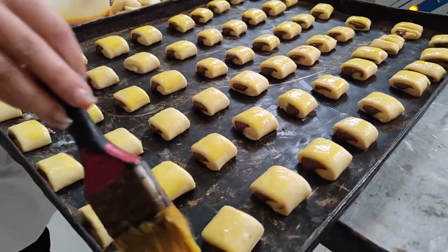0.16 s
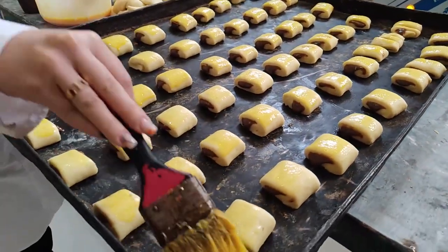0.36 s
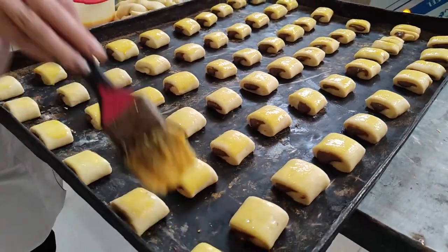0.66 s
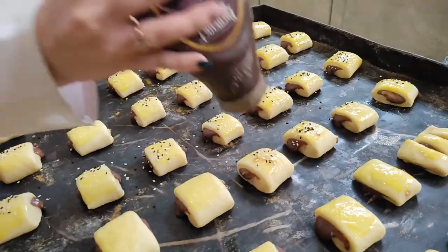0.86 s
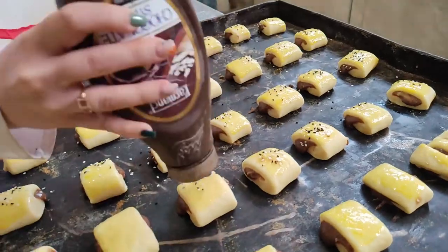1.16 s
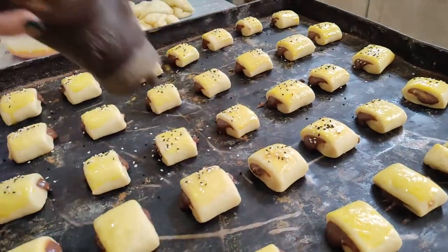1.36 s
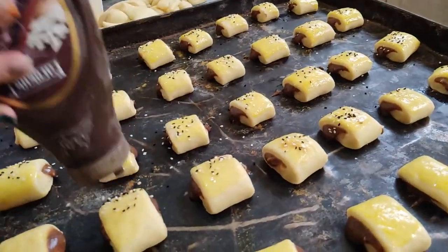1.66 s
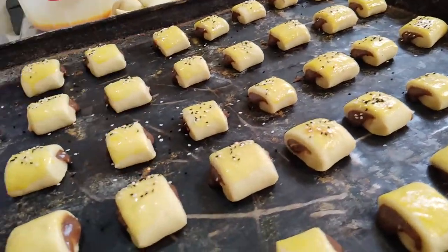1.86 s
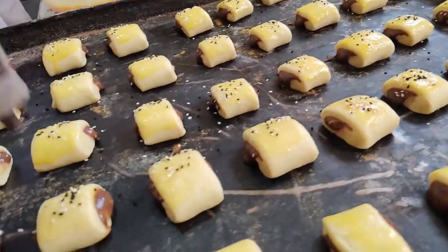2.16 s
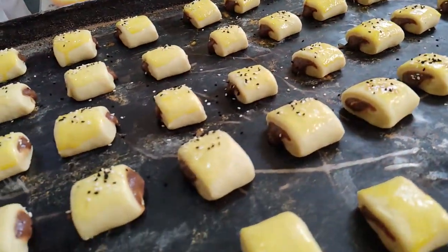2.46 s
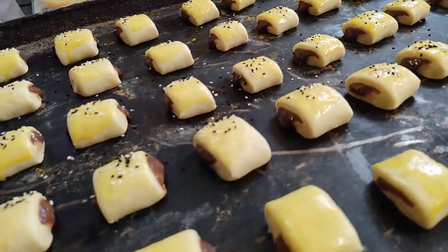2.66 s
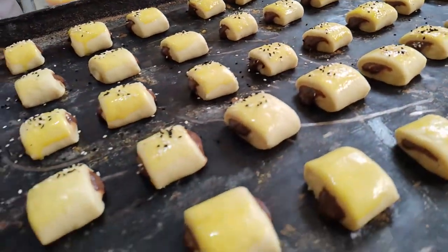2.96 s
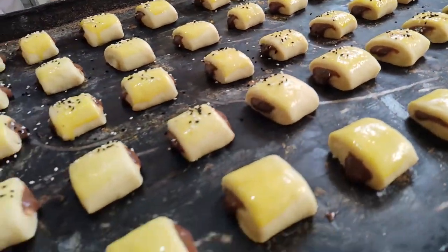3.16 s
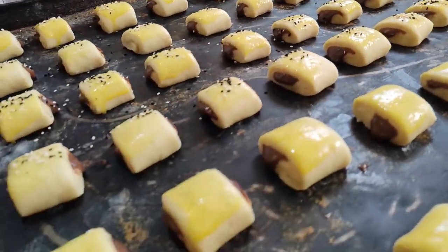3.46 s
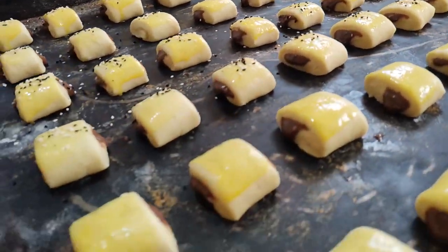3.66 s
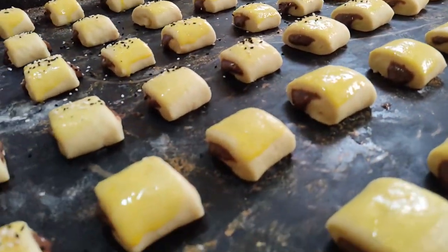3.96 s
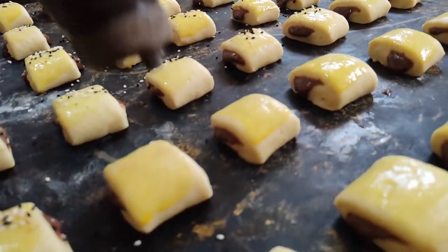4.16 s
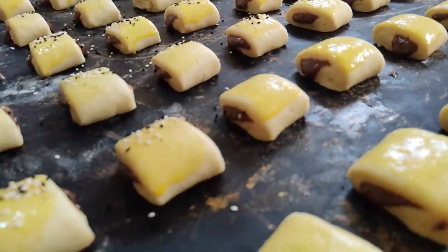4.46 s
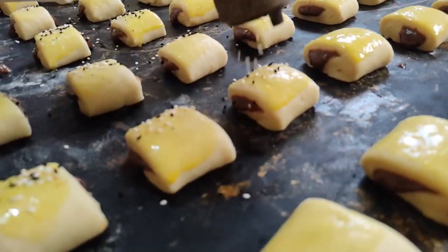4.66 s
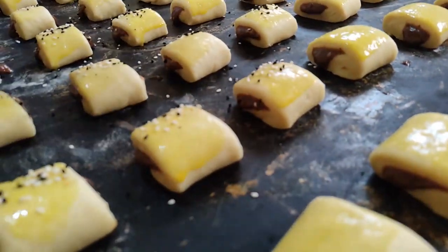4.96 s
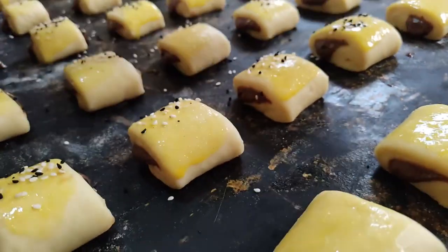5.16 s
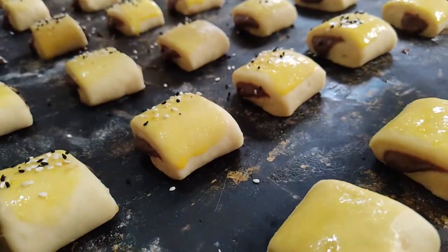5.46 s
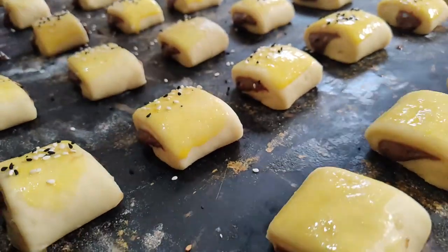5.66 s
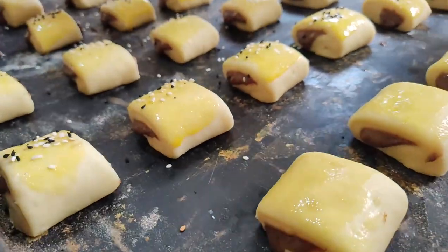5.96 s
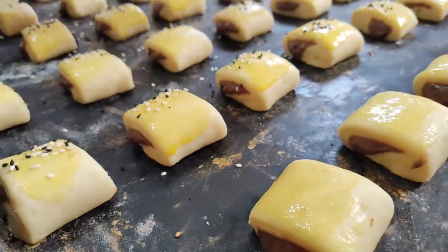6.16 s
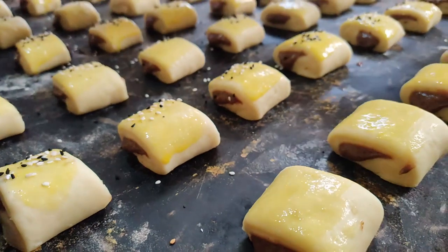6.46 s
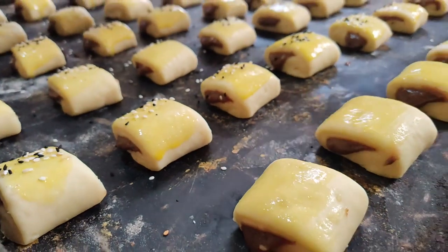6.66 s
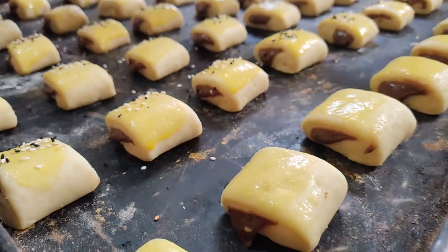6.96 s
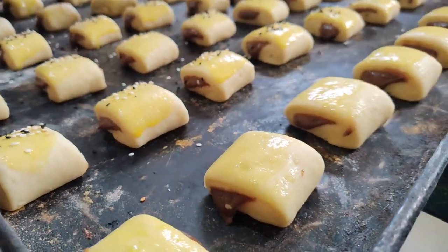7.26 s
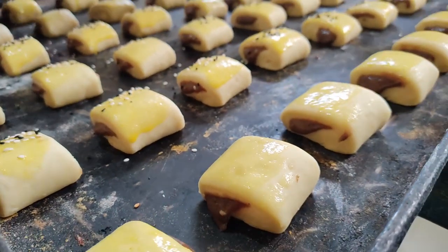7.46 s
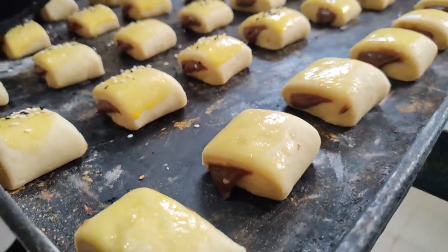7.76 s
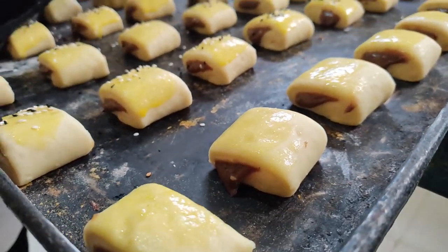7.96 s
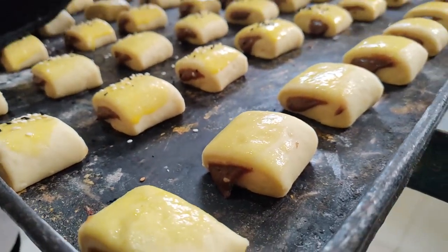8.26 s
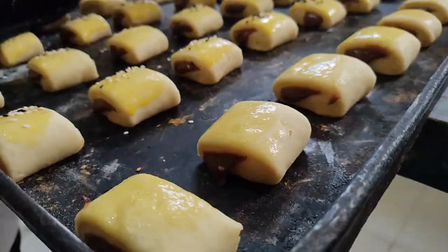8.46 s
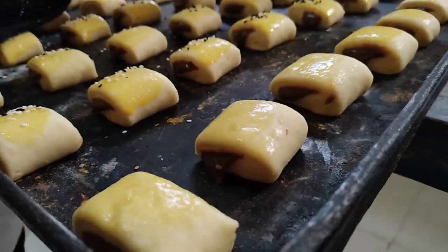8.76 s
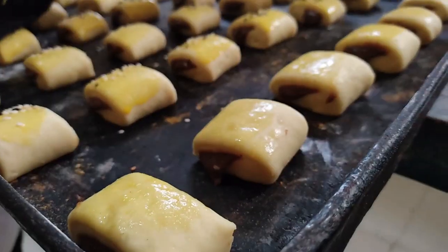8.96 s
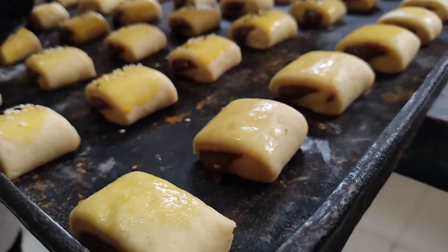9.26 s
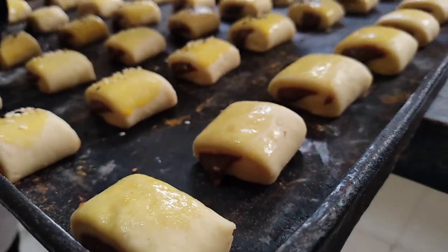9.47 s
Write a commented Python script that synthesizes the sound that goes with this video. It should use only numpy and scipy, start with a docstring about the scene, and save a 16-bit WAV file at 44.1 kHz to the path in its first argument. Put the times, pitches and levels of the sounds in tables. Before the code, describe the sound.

Right at the start, a wet brush makes one light tick on a metal baking tray. At about 0.8 seconds comes a brief, faint rattle of seeds in a plastic jar, and from 1.1 seconds the jar is shaken evenly, a little over twice a second, close to the microphone and slightly to the left. Each shake is a dense, bright double rattle as the seeds fly to the lid and fall back, with a slight hollow plastic tone. The shakes are loudest from about 1.6 to 4.7 seconds, then soften, are weakest around 7.6 to 8.1, and pick up a little until about 9.5. A few stray seeds trickle very faintly near 4.9 and 9.2 seconds. Throughout, the bakery's fans and ducts hum quietly, faint whines come and go, and a fine hiss slowly eases. There is almost no echo.

```python
"""In a bakery, seeds are shaken from a plastic jar over a baking tray, about twice a second, near a phone.
Each shake throws them to the lid and back: a dense rattle of tiny impacts that excite the resonances
of the seeds, the wall and the enclosed air. A few stray seeds drop. At the start a wet brush ticks once
on the tray. Behind it all, fans and ducts hum, faint whines come and go and a fine hiss slowly eases."""
import sys
import numpy as np
from scipy import signal
from scipy.io import wavfile
from scipy.ndimage import uniform_filter1d

SR = 44100
rng = np.random.default_rng(int(sys.argv[2]) if len(sys.argv) > 2 else 0)


def int16_out(signal):
    """Quantize to a 16-bit WAV file."""
    q = np.round(np.clip(np.atleast_2d(signal).T, -1, 1) * 32767)
    wavfile.write(sys.argv[1], SR, q.astype(np.int16))


N = 423360

# Broad spectra of the bakery's hum and hiss: (frequency [Hz], relative spectral level [dB])
HUM_SPECTRUM = [(15, -40), (25, -11), (55, -13), (82, -19), (115, -20), (142, -16), (165, -8), (300, -9.5),
                (560, -14), (720, -14.5), (900, -13), (1030, -17.5), (1250, -12), (1550, -16), (2200, -19),
                (3000, -34), (5000, -80)]
HISS_SPECTRUM = [(1300, -26), (2300, -9), (3700, -10.5), (6000, -11), (7300, -6.5), (8800, -13.5),
                 (9600, -26), (12000, -34), (15700, -58)]
# Resonances of fans and ducts: (frequency [Hz], nominal width [Hz], relative level [dB])
FAN_RESONANCES = [(167.2, 10.4, -2.5), (200.9, 15.8, 0.5), (223.3, 8.8, -0.5), (237, 7.3, 0),
                  (290, 8.5, -16), (378, 16.5, -3), (401.4, 12.5, 0.5), (610, 50, -9.5), (656, 20, -7.5),
                  (890, 14, -9), (1170, 17, -12), (1419, 29, -7)]
# Slow decline of the hiss: (time [s], level [dB])
HISS_LEVEL = [(0, -70), (3, -71.5), (9.6, -73.5)]
# Likeness of the background in the two channels: (frequency [Hz], correlation [-1 to 1])
AIR_CORRELATION = [(60, 0.42), (150, 0.99), (380, 0.82), (950, 0.035), (2380, 0.27), (5980, -0.13),
                   (15000, 0.15)]
# Balance of the background: (frequency [Hz], left minus right [dB])
AIR_BALANCE = [(60, 7), (130, 1.5), (290, 7), (640, 3.5), (1410, -0.5), (3100, -1.5), (6820, -6.5),
               (15000, 4.5)]
# Faint fuzzy whines: (start [s], end [s], frequency [Hz], resonator width [Hz], level [dB])
WHINES = [(0, 0.88, 2700, 63, -82), (-0.5, 0.78, 1800, 50, -84), (.8, 2.4, 1786, 270, -74),
          (5, 9.1, 2310, 66, -83), (0, 0.84, 635, 74, -75.5), (3, 9.6, 640, 33, -74),
          (1, 3.2, 342, 57, -74), (0.5, 2.6, 93, 4, -84.5), (0.3, 3.3, 164, 20, -73.5),
          (5, 6.3, 99, 7.8, -91)]
# Contact of the brush with the tray: (time [s], peak level before panning [dB])
BRUSH_TICKS = [(0.0215, -40)]
# Modes of the tray: (frequency [Hz], relative level [dB], time to decay by 60 dB [s])
TRAY_MODES = [(2615, 0, 0.056), (6820, 1, 0.018), (7200, -3, 0.016), (7870, -3, 0.021)]
# The tail of a shake, levels nominal: (time [s], rattle level [dB], decay rate [dB/s],
# wall re rattle [dB], cavity re wall [dB], wall patch frequency [Hz], patch re rattle [dB])
SHAKE_TAIL = (.8145, -53, 300, -4.5, -5.5, 730, -22)
# One shake a row, levels nominal: (arrival at the lid [s], rattle level [dB], bunching [dB],
# wall re rattle [dB], fall of the heap [s], rattle level [dB], spread of the fall [s],
# wall re rattle [dB], cavity re wall [dB], wall patch frequency [Hz], patch re rattle [dB])
SHAKES = [(1.114, -48.5, -0.5, -8, 1.201, -47.5, 0.068, -7.5, -4.5, 5800, -18),
          (1.56, -38.5, 3.5, -14, 1.646, -33.5, 0.018, -16.0, -7, 2160, -25),
          (2.017, -34, 3, -15, 2.102, -30.0, 0.015, -11.5, -7.5, 2060, -25.5),
          (2.446, -37, 4, -12.5, 2.526, -30.5, 0.034, -15, -10.5, 3180, -30),
          (2.894, -42.5, 6.5, -16.5, 2.97, -31.5, 0.056, -15.5, -15, 3080, -22),
          (3.326, -38, 0.5, -17.5, 3.396, -33, 0.057, -14, -16, 3280, -18.5),
          (3.765, -39.0, 3, -16, 3.833, -28, 0.029, -12.0, -5, 3670, -21.5),
          (4.196, -37.5, 6.5, -14.0, 4.264, -30.0, 0.025, -10.5, -11.5, 2330, -18),
          (4.626, -37.0, 0, -14, 4.69, -31, 0.021, -12.5, -9, 5360, -11.5),
          (5.055, -45, -1.5, -8, 5.123, -35.5, 0.047, -12, -10.5, 5300, -12),
          (5.474, -40, 2, -14.5, 5.552, -38, 0.052, -14.5, -9, 5560, -14),
          (5.9, -41.5, 0.5, -17.5, 5.982, -39, 0.05, -12, -17, 4000, -18.5),
          (6.355, -39.5, 1.5, -14.5, 6.431, -39.5, 0.047, -11.5, -16, 5400, -18),
          (6.77, -47, 2.5, -24, 6.827, -44.5, 0.13, -13.5, -10, 4950, -16.5),
          (7.165, -42.5, -0.5, -17, 7.241, -43.0, 0.084, -19.5, -15, 4250, -18),
          (7.61, -53, 2.0, -14, 7.678, -45.5, 0.097, -19.5, -10, 3630, -23),
          (8.05, -58.5, -1.5, -8.0, 8.13, -48.5, 0.14, -18, -15, 4470, -21),
          (8.563, -42, -1.5, -19, 8.62, -42.5, 0.103, -17.0, -13, 5160, -14.5),
          (8.963, -44.5, 1, -14.5, 9.027, -41.5, 0.12, -17, -11, 4630, -14.5),
          (9.339, -43, -3, -17, 9.407, -43.0, 0.1, -20, -15, 4450, -17.5)]
# Effect of where the jar is held, nominal: (time [s], left minus right [dB], sparkle re rattle [dB])
JAR_POSITION = [(.8, -4, -9), (1.15, -4, -12), (1.6, -3.5, -29), (2.3, -1.5, -19.5), (3.9, -0.5, -16.5),
                (4.27, -5.5, -19.5), (5.1, -9, -17.5), (6, -9, -16), (6.6, -6, -15.5), (9.6, -5.5, -16.5)]
# Seed striking seed, lifted by the resonance of each microphone's port; left table, then right:
# (frequency [Hz], relative spectral level [dB])
SEED_SPECTRA = ([(1500, -28.5), (3500, -32.5), (5200, -16.5), (6500, -1), (8000, 2.5), (9000, -1),
                (9800, -20), (12000, -41.5)], [(1500, -41.5), (3500, -40.5), (5000, -18), (6200, -7.5),
                (7200, -0.5), (8500, -6), (9800, -22.5), (12000, -40.5)])
# The impacts' top treble, the plastic wall and the air cavity in the jar:
# (frequency [Hz], relative spectral level [dB])
SPARKLE_SPECTRUM = [(6000, -17), (9500, 0), (10600, -1), (12000, -4.5), (13500, -8.5), (15600, -13)]
WALL_SPECTRUM = [(900, -27), (1900, -19.5), (2500, -1), (3500, 1), (4800, 1.5), (6000, 1), (9000, -32.5)]
CAVITY_SPECTRUM = [(300, -36), (740, -19), (890, 0), (990, -5), (1120, -1), (1300, -16), (1900, -15),
                   (3000, -32)]
# Tuning of the air space in the tilted jar: (time [s], frequency factor [ratio])
CAVITY_TUNING = [(1, 1.15), (3.4, 1.04), (3.8, 0.97), (9.6, 1.02)]
# Late seeds trickling down: (time [s], nominal level [dB])
STRAY_SEEDS = [(4.84, -70), (4.915, -70), (9.19, -71.5)]

HUM_DB, BAND_LIMIT_HZ = -63, 15750
BEFORE_S, AFTER_S = 0.13, 0.17  # a shake spans BEFORE_S ahead of the lid and twice AFTER_S beyond
LOOSE_S, ONSET_DB_PER_S = 0.034, 716  # seeds are loose this long before the lid; earlier, a fast swell
KNEE_S = 0.0073  # softness of the change from swell to throw
LID_RISE_DB_PER_S, LID_FALL_DB_PER_S = 223, 181
BACK_RISE_DB_PER_S, BACK_FALL_DB_PER_S = 322, 605
BUNCH_S, LULL_S, LULL_LAG_S, LULL_SHARE = 0.0094, 0.01, 0.022, 0.48  # seeds bunch, then fly free
WALL_LAG_S = 0.006  # the falling heap reaches the wall a little later


def gain_of(db):
    """Amplitude ratio of a level in decibels."""
    return 10 ** (np.asarray(db) / 20)


def unit_rms(x):
    """Normalisation to a root-mean-square value of 1."""
    return x / np.sqrt(np.mean(x ** 2) + 1e-20)


def value_at(points, hz):
    """Interpolation of a table along a logarithmic frequency axis."""
    f, value = np.transpose(points)
    return np.interp(np.log(hz + 1), np.log(f + 1), value)


def impulse_response(spectrum, size=2048):
    """Minimum phase: the Hilbert transform of the log magnitude fixes a causal response, of energy 1."""
    log_gain = np.log(gain_of(value_at(spectrum, abs(np.fft.fftfreq(size, 1 / SR)))))
    taps = np.fft.ifft(np.exp(np.conj(signal.hilbert(log_gain)))).real[:size // 2]
    return taps / np.linalg.norm(taps)


def convolve(x, responses):
    """Linear filtering: each channel is convolved with a response and keeps its length."""
    return signal.oaconvolve(x, responses, axes=1)[:, :x.shape[1]]


def add(mix, start_s, sound):
    """Superposition of a sound on the mix from a given time."""
    part = mix[:, round(start_s * SR):][:, :sound.shape[1]]
    part += sound[:, :part.shape[1]]


def air_noise(spectrum_db, patchy_db):
    """A partly coherent field: correlated stereo noise whose spectrum drifts in patches."""
    frames, hz = N // 1024 + 5, np.fft.rfftfreq(4096, 1 / SR)
    a, b, c, d, patches = rng.standard_normal((frames, 2049, 5)).T
    patches = unit_rms(uniform_filter1d(uniform_filter1d(patches, size=12, axis=0), size=8, axis=1))
    correlation = np.clip(value_at(AIR_CORRELATION, hz), -1, 1)[:, None]
    left = a + 1j * b
    right = correlation * left + np.sqrt(1 - correlation ** 2) * (c + 1j * d)
    balance_db = np.array([.5, -.5])[:, None, None] * value_at(AIR_BALANCE, hz)[:, None]
    gain = gain_of(spectrum_db(hz)[:, None] + balance_db + patchy_db * patches)
    out = signal.istft(gain * np.array([left, right]), nperseg=4096, noverlap=3072)[1][:, :N]
    return out / np.sqrt(np.mean(out.mean(0) ** 2))


def fan_hum():
    """Resonances of fans and ducts add in power to a broad, low noise spectrum."""
    def spectrum_db(hz):
        peaks = sum(gain_of(db) ** 2 / (1 + (2 * (hz - centre) / width) ** 2) ** 2
                    for centre, width, db in FAN_RESONANCES)
        return 10 * np.log10(gain_of(value_at(HUM_SPECTRUM, hz)) ** 2 + peaks)
    return gain_of(HUM_DB) * air_noise(spectrum_db, patchy_db=1.7)


def hiss():
    """Broadband noise in the treble, strongest at the start."""
    level = gain_of(np.interp(np.arange(N) / SR, *np.transpose(HISS_LEVEL)))
    return level * air_noise(lambda hz: value_at(HISS_SPECTRUM, hz), patchy_db=3.7)


def resonate(x, hz, width_hz):
    """A resonance of unit gain by heterodyning: shift down to zero, smooth, shift back."""
    carrier = np.exp(2j * np.pi * hz * np.arange(x.shape[-1]) / SR)
    pole = np.exp(-np.pi * width_hz / SR)
    return 2 * (carrier * signal.lfilter([1 - pole], [1, -pole], x / carrier)).real


def whines():
    """Noise confined to a narrow band is heard as a fuzzy pitch; each band fades in and out."""
    out, t = np.zeros((2, N)), np.arange(N) / SR
    for start, end, hz, width, db in WHINES:
        fade = np.clip(np.minimum(t - start, end - t) / .05, 0, 1)
        noise = rng.standard_normal((2, N)) + 3.8 * rng.standard_normal(N)  # mostly common to both sides
        out += gain_of(db) * fade * unit_rms(resonate(resonate(noise, hz, width), hz, width))
    return out


def impacts(size, per_s, spread_db, shared):
    """Shot noise of rms 1: uneven impulses in clumps, a share of their power common to both sides."""
    fast, slow = (unit_rms(uniform_filter1d(rng.standard_normal(size), size=n)) for n in (160, 700))
    clumps = gain_of(1.5 * fast + slow)
    impulses = rng.choice([-1., 1.], (3, size)) * (rng.random((3, size)) < per_s / SR)
    strength = gain_of(spread_db * np.minimum(rng.exponential(1, (3, size)), 2.8))
    hits = strength * impulses * clumps
    return unit_rms(np.sqrt(1 - shared) * hits[:2] + np.sqrt(shared) * hits[2])


def brush_tick():
    """Impact excitation: a snap and a short scatter of bristle taps ring the tray's damped modes."""
    out, t = np.zeros((2, N)), np.arange(4000) / SR
    ring = sum(gain_of(db - 60 * t / t60) * np.sin(2 * np.pi * hz * t) for hz, db, t60 in TRAY_MODES)
    bristles = gain_of(-16 - 60 * t / 0.16) * impacts(len(t), per_s=4000, spread_db=3.3, shared=0.41)
    snap = gain_of(-8) * np.hanning(40) * np.sin(2 * np.pi * 7000 * t[:40])
    bristles[:, :40] += snap
    tick = convolve(bristles, ring[None])
    for start_s, peak_db in BRUSH_TICKS:
        add(out, start_s, gain_of(peak_db) * tick / abs(tick).max())
    return out * gain_of([[-1.5], [1.5]])


def shake_tail():
    """The tail of a shake: a seed rattle that starts abruptly and dies away in fast exponential decay."""
    out = np.zeros((2, N))
    start_s, level_db, decay_db_per_s, wall_db, *colour = SHAKE_TAIL
    t = np.arange(start_s, start_s + AFTER_S, 1 / SR)
    rattle_db = level_db - decay_db_per_s * (t - start_s)
    add(out, start_s, jar_rattle(t, rattle_db, rattle_db + wall_db, *colour))
    return out


def jar_rattle(t, rattle_db, wall_db, cavity_db, patch_hz, patch_db):
    """Source and filter: impacts ring the seeds, the wall, a free patch of it and the air in the jar."""
    def excite(level, spectra, per_s, spread_db, shared):
        force = level * impacts(len(t), per_s, spread_db, shared)
        return convolve(force, [impulse_response(spectrum) for spectrum in spectra])

    times, *position = np.transpose(JAR_POSITION)
    side_db, sparkle_db = (np.interp(t.mean(), times, column) for column in position)
    sides = np.array([[.5], [-.5]])
    rattle, on_wall = gain_of(rattle_db), gain_of(wall_db)
    hardness = rattle / rattle.max()  # harder blows are brighter
    on_patch = on_wall * rattle.max() / on_wall.max()
    patch_spectrum = [(patch_hz * ratio, db)
                      for ratio, db in [(0.62, -35), (0.88, -6), (1, 0), (1.05, -6), (1.7, -35)]]
    tuning = np.interp(t[0], *np.transpose(CAVITY_TUNING))
    cavity_spectrum = [(hz * tuning, db) for hz, db in CAVITY_SPECTRUM]

    # the phone shades the ports' peak strongly; the left microphone receives more of the lows
    seed_level = rattle * gain_of(0.5 + sides * side_db)
    sparkle_level = rattle * hardness ** 0.06 * gain_of(4 + sparkle_db + sides * (0.29 * side_db + 0.3))
    patch_level = on_patch * gain_of(patch_db + sides * 1.04 * side_db)
    wall_level = on_wall * gain_of(0.5 + sides * (0.69 * side_db + 2.5))
    cavity_level = on_wall * hardness ** 0.089 * gain_of(cavity_db - 3 + sides * (.5 * side_db + 5))

    seeds = excite(seed_level, SEED_SPECTRA, per_s=8000, spread_db=3.6, shared=.03)
    sparkle = excite(sparkle_level, [SPARKLE_SPECTRUM], per_s=5000, spread_db=4, shared=.15)
    patch = excite(patch_level, [patch_spectrum], per_s=5000, spread_db=3.5, shared=.2)
    wall = excite(wall_level, [WALL_SPECTRUM], per_s=5000, spread_db=3.5, shared=.1)
    cavity = excite(cavity_level, [cavity_spectrum], per_s=2000, spread_db=3.5, shared=.4)
    knock = np.roll(cavity, 260, axis=1)  # about 6 ms later, as the heap lands
    return early_reflections(seeds + sparkle + patch + wall) + knock


def early_reflections(x, count=4):
    """Echoes from tray, hand and rolls interfere in a pattern that changes as the jar moves."""
    position = np.linspace(0, count - 1, x.shape[1])
    out = 0
    for k in range(count):
        echoes = np.zeros((2, 420))
        np.put_along_axis(echoes, rng.integers(12, 420, (2, 9)), .5 * rng.standard_normal((2, 9)), 1)
        echoes[:, 0] = 1  # direct path
        echoes /= np.linalg.norm(echoes, axis=1, keepdims=True)
        crossfade = np.cos(np.pi / 2 * np.clip(position - k, -1, 1))
        out = out + convolve(x * crossfade, echoes)
    return out


def throw_level(t, lid_s, lid_db, bunch_db, back_s, back_db, spread_s):
    """Incoherent addition, in dB: the pointed throw to the lid and the rounded fall of the heap."""
    throw_db = lid_db - np.where(t < lid_s, -LID_RISE_DB_PER_S, LID_FALL_DB_PER_S) * (t - lid_s)
    slope = np.where(t < back_s, BACK_RISE_DB_PER_S, BACK_FALL_DB_PER_S)
    fall_db = back_db - slope * (np.hypot(t - back_s, spread_s) - spread_s)
    power = gain_of(throw_db) ** 2 + gain_of(fall_db) ** 2
    bunch = np.exp(-((t - lid_s) / BUNCH_S) ** 2)
    lull = LULL_SHARE * np.exp(-((t - lid_s - LULL_LAG_S) / LULL_S) ** 2)
    onset_cut_db = ONSET_DB_PER_S * KNEE_S * np.logaddexp((lid_s - LOOSE_S - t) / KNEE_S, 0)
    return 10 * np.log10(power) + bunch_db * (bunch - lull) - onset_cut_db


def jar_shakes():
    """Inertia carries the seeds to the lid and back, giving two bursts of collisions a shake."""
    out = np.zeros((2, N))
    for lid_s, lid_db, bunch_db, lid_wall_db, back_s, back_db, spread_s, back_wall_db, *colour in SHAKES:
        t = lid_s - BEFORE_S + np.arange(round((BEFORE_S + 2 * AFTER_S) * SR)) / SR
        rattle_db = throw_level(t, lid_s, lid_db, bunch_db, back_s, back_db, spread_s)
        wall_db = throw_level(t, lid_s, lid_db + lid_wall_db, bunch_db,
                              back_s + WALL_LAG_S, back_db + back_wall_db, spread_s)
        add(out, t[0], jar_rattle(t, rattle_db, wall_db, *colour))
    return out


def stray_seeds():
    """Falling seeds make faint bursts of shot noise, each a few hundredths of a second long."""
    t = np.arange(N) / SR
    level = sum(gain_of(db) * np.exp(-((t - s - .012) / 0.017) ** 2) for s, db in STRAY_SEEDS)
    hits = level * gain_of([[-2], [3]]) * impacts(N, per_s=2500, spread_db=3, shared=0.083)
    snap = impulse_response(SEED_SPECTRA[1]) + gain_of(-9) * impulse_response(SPARKLE_SPECTRUM)
    return convolve(hits, snap[None])


def reverberation(x, t60):
    """A diffuse field: reflections of random sign, different on each side, decay exponentially."""
    size = SR // 2
    taps = np.zeros((2, size))
    delays = np.arange(200, size - 20, 20) + rng.integers(0, 20, (2, (size - 201) // 20))
    np.put_along_axis(taps, delays, rng.choice([-1., 1.], delays.shape), 1)
    taps *= gain_of(-60 * np.arange(size) / SR / t60)
    return convolve(x, taps / np.linalg.norm(taps[0]))


def scene():
    """Superposition of the near sources, their reverberation and the bakery's background."""
    near = shake_tail() + jar_shakes() + brush_tick() + stray_seeds()
    return near + gain_of(-31) * reverberation(near, t60=0.23) + fan_hum() + hiss() + whines()


def record(dry):
    """Band limiting by a linear-phase low-pass filter."""
    lowpass = signal.firwin(1023, BAND_LIMIT_HZ, window=("kaiser", 9), fs=SR)
    return signal.oaconvolve(dry, lowpass[None], "same")


dry = scene()
out = record(dry)
int16_out(out)
```